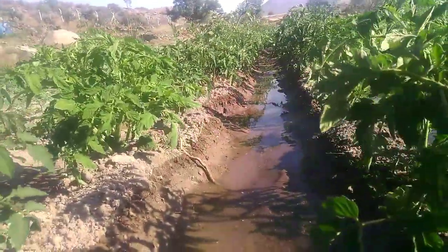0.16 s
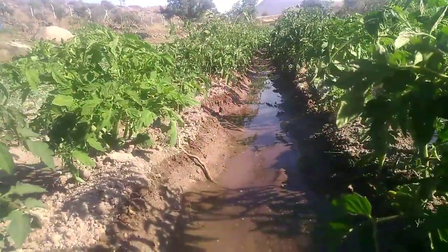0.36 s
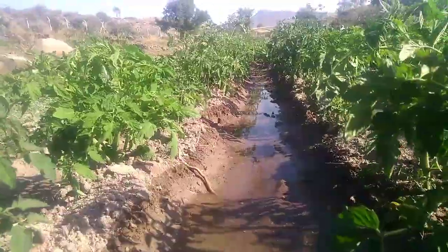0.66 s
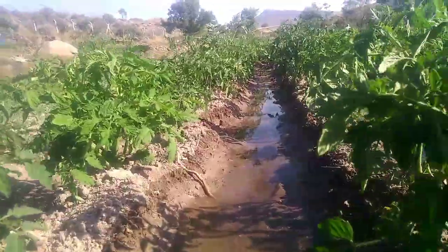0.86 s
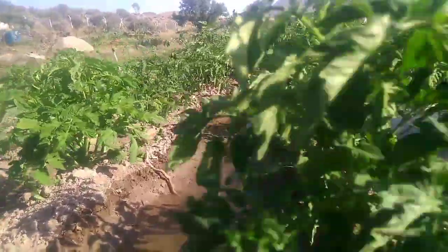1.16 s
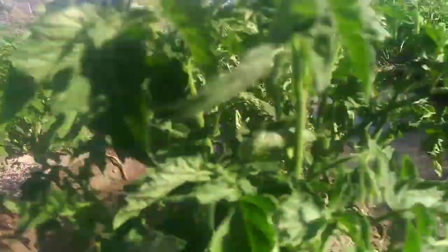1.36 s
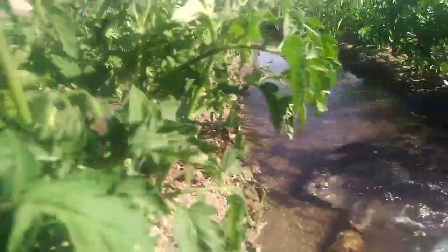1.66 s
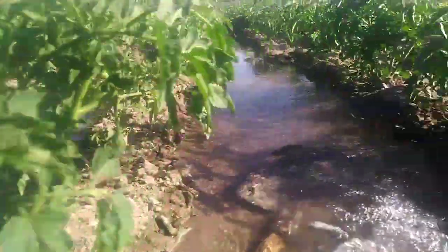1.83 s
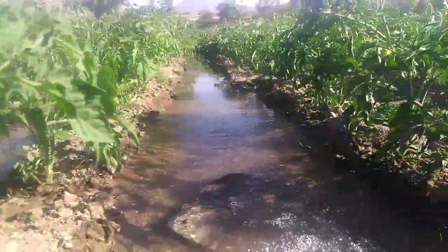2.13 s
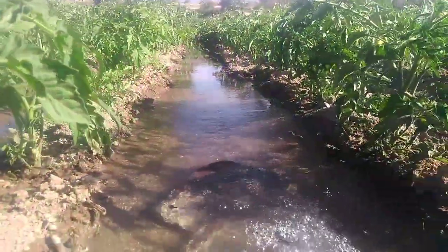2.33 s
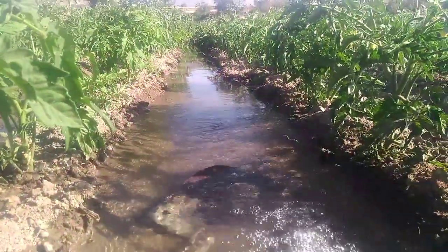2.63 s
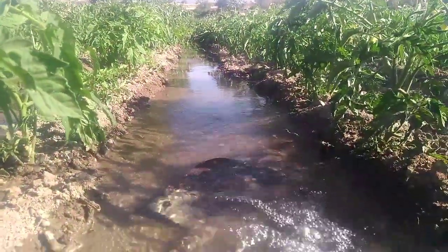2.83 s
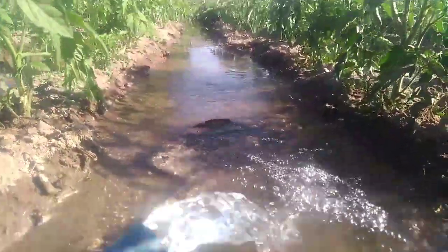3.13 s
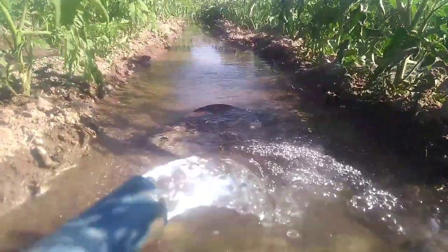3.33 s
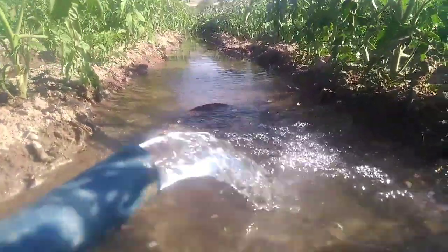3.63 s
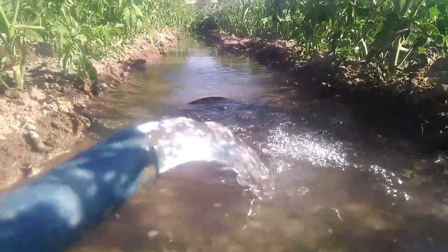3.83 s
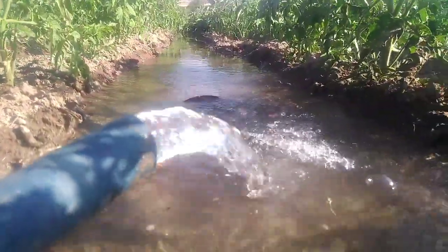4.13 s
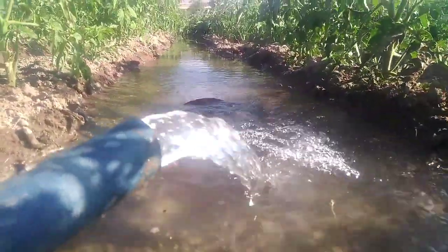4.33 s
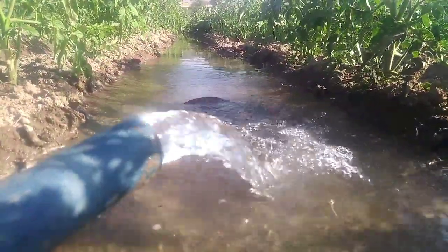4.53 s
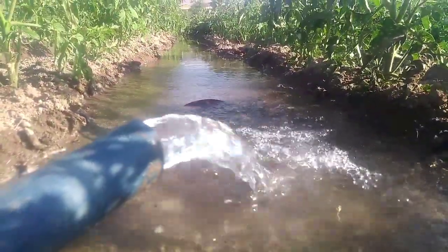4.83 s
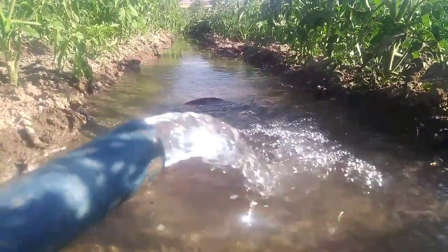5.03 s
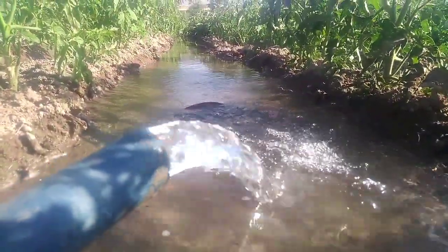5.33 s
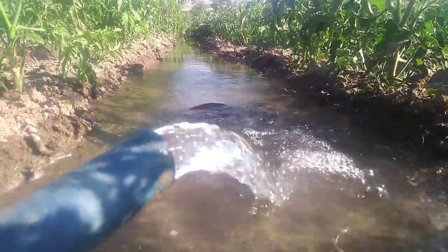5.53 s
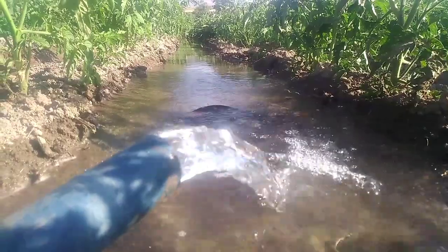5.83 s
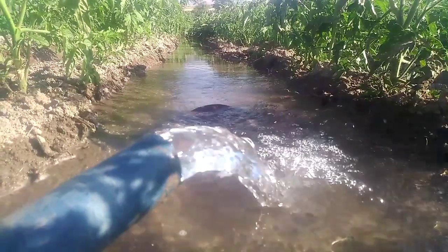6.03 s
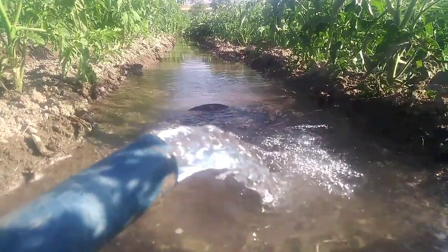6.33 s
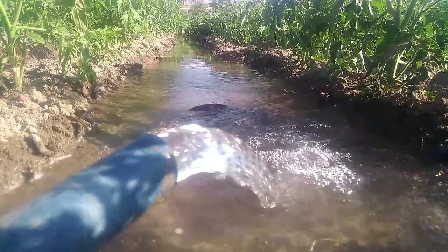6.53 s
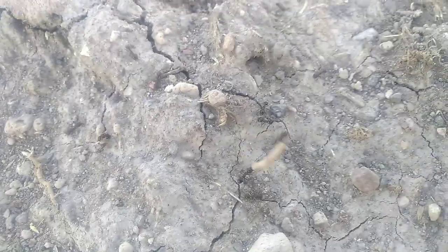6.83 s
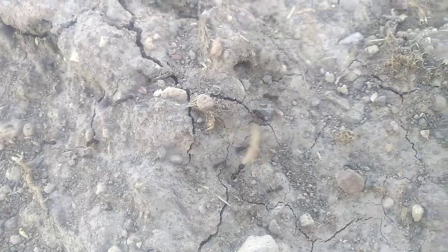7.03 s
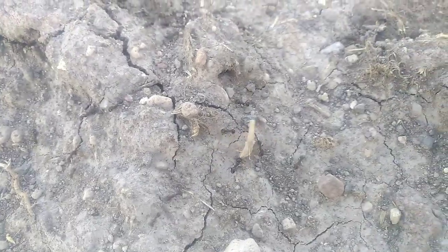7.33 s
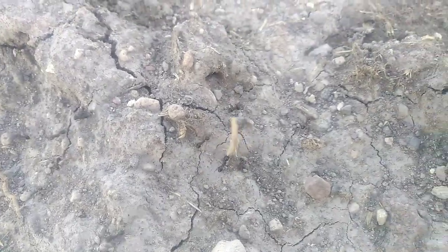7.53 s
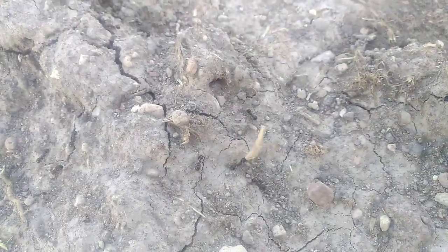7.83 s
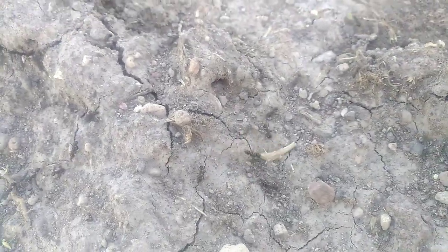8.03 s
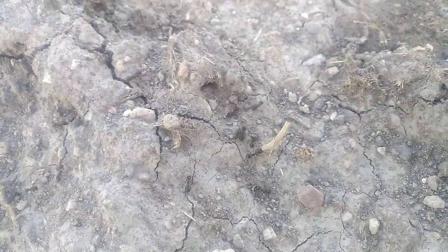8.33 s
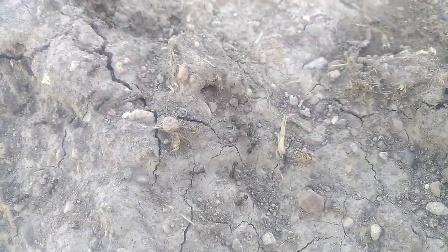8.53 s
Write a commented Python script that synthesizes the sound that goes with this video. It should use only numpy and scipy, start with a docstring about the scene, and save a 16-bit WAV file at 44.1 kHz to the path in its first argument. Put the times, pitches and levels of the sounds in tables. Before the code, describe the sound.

Outdoors in a crop field, a jet of water splashes into a flooded furrow, first softened behind leaves and off to the left, with light plops and a sharp tap on the handheld microphone. The microphone turns and moves close; the splash becomes central, louder and wider, full of gulps and bubbling. It cuts off abruptly, leaving very quiet open air with low rumble, faint hum, thin hiss and sparse dry ticks.

```python
"""A jet gushes from an irrigation pipe into a flooded furrow: swarms of damped sines over a noise wash.
Heard from behind leaves, with plops (clicks and rings) and taps on the housing (damped sines).
The microphone turns and nears the jet: low gulps and bloops (damped sines), glugs (gliding sines).
The water cuts off. Dry ground: far hum (wavering sines), thin hiss (band noise), ticks (noise snaps).
A low noise rumble lies under both, with a short gap at the cut."""
import sys
import numpy as np
from scipy import signal
from scipy.fft import rfft, irfft, next_fast_len
from scipy.io import wavfile
from scipy.ndimage import map_coordinates

SR = 44100
rng = np.random.default_rng(int(sys.argv[2]) if len(sys.argv) > 2 else 0)


def persist_wave(psi):
    """Save psi, clipped to +-1, as 16-bit WAV."""
    counts = np.round(np.clip(psi, -1, 1) * 32767).astype(np.int16)
    wavfile.write(sys.argv[1], SR, np.atleast_2d(counts).T)


N = 383225

# Jet position: [t/s, lead of left port/ms, nearness: 0 behind leaves, 1 facing, 2 close]
PLACE = [(0, 0.32, 0.23), (0.33, 0.32, 0.05), (0.7, 0.31, 0.11), (1.15, 0.31, 0.39), (1.5, 0.2, 0.94),
         (1.902, -0.024, 0.99), (2.8, -0.025, 1.28), (3.501, -0.057, 1.78)]
# Jet by place: [nearness, gurgle level/dB, spray level/dB, spread of leads/ms, bank echo level/dB]
LOUDNESS = [(0, -56, -49, 0.029, -12), (1, -50, -49, .11, -5.5), (2, -47.5, -45, .12, -3)]
# Splash colour at each place, relative: [f/Hz, level per Hz/dB]
BEHIND = [(120, -15), (250, -20), (440, -4.5), (600, -14), (950, -4), (1330, -17), (1600, -10),
          (1950, -7.5), (2200, -9), (2700, 0), (3400, -15.5), (5400, -12), (7800, -24.5), (11000, -22.5),
          (15500, -46)]
FACING = [(120, -16), (260, -16.5), (390, -3), (550, -14), (780, -1), (1050, -7.5), (2100, -2), (2800, -1),
          (3200, -3), (4400, -2.5), (6600, -7), (8000, -17), (10500, -13.5), (15500, -26.5)]
CLOSE = [(120, -11.5), (275, -12.5), (370, -6), (590, 2.5), (900, -2.5), (1550, 0), (1900, -5.5),
         (2300, 0.5), (3000, -7), (3600, 5), (5400, -2), (7000, -2.5), (8100, -22), (10500, -23.5),
         (15500, -30.5)]
# Colour of the churning pool, relative: [f/Hz, level per Hz/dB]
WASH = [(100, -9.5), (400, -4), (1000, 1.5), (1500, -17), (2700, 2), (5500, 1.5), (8000, -15.5), (9300, -1),
        (10800, -3), (12000, -7), (12800, -25), (15500, -26)]
# Colour of the open field's rumble, relative: [f/Hz, level per Hz/dB]
RUMBLE = [(20, -20), (50, -6.5), (100, 4.5), (220, -2.5), (340, -8), (450, -13.5), (650, -32), (1200, -42),
          (5500, -43), (12000, -55.5)]
# Lulls between bursts of splashing: [t/s, gain/dB]
LULLS = [(0.612, -6.5), (0.772, -6.5), (1.17, -3), (2.12, 0), (5.73, -4), (6.599, -5)]
# Loudest drops, each trapping a small bubble: [first contact t/s, reference level/dB, f/Hz]
PLOPS = [(0.1383, -25.5, 2660), (0.1553, -24, 2610), (0.22, -26.5, 2530), (0.455, -29, 2520),
         (0.5387, -26, 2820), (0.5546, -23.5, 5870), (0.578, -33.5, 2500), (0.716, -34, 3100),
         (0.732, -27.5, 3720), (0.826, -23, 2660), (0.8321, -24, 2680), (0.907, -30.5, 3950),
         (0.9906, -28, 4770), (1.267, -25, 2670), (1.292, -21.5, 4600), (1.393, -28.5, 2550),
         (1.5256, -29, 3900), (1.8947, -21, 5760), (1.9599, -22.5, 3930), (2.0394, -25.5, 2420),
         (2.645, -29, 6800), (2.174, -27, 3760), (2.347, -23.5, 2660), (2.4412, -20.5, 4480),
         (2.8971, -21.5, 4230), (3.0042, -23, 4900), (3.0388, -24, 4220), (3.189, -28.5, 4450),
         (3.4622, -19, 5000), (3.5345, -21.5, 3840), (3.578, -26.5, 3530), (3.7142, -20.5, 5330),
         (3.8763, -18, 5300), (3.913, -25, 3750), (4.034, -22, 3680), (4.3934, -23.5, 4500),
         (4.472, -22.5, 6400), (4.501, -21, 3620), (4.6085, -21.5, 5860), (4.6976, -25.5, 3950),
         (4.9075, -22.5, 3590), (4.9263, -22, 3700), (4.999, -18, 3600), (5.0363, -21.5, 4100),
         (5.087, -22, 4500), (5.2345, -25.5, 3750), (5.483, -20, 3800), (5.498, -21, 3530),
         (5.5364, -25, 5900), (5.56, -26.5, 3620), (5.698, -14.5, 4470), (5.7891, -18, 5320),
         (5.8757, -23, 2450), (5.8804, -16.5, 3730), (5.953, -24, 5900), (5.9614, -24, 6000),
         (5.964, -26.5, 2500), (6.051, -23, 5300), (6.183, -19, 3720), (6.3241, -21, 5970),
         (6.5548, -30.5, 2420)]
# Knocks on the microphone's housing: [t/s, level/dB, f/Hz, life/cycles]
KNOCKS = [(0.419, -9.5, 3350, 0.25), (0.421, -29, 4250, 1.7), (0.4235, -6, 3430, 0.59),
          (0.424, -16, 264, 0.32), (1.178, -37.5, 93.6, 1.7), (1.3, -57, 79, 7.6)]
# Gulps of the air pocket under the jet: [t/s, level/dB]
GULPS = [(1.291, -35), (1.464, -36), (1.954, -34), (2.276, -34), (2.378, -34), (3.179, -33), (3.363, -35),
         (3.533, -29), (3.77, -36.5), (4.008, -35), (4.098, -34.5), (4.244, -32), (4.625, -28.5),
         (4.689, -24.5), (5.034, -36), (5.693, -32), (5.967, -34), (6.058, -40)]
# Large bubbles from the plunge: [t/s, level/dB, starting f/Hz, life/cycles]
BLOOPS = [(1.553, -36, 862, 5.9), (1.628, -32.5, 2000, 4.4), (1.863, -35.5, 883, 3.6), (2.06, -33, 689, 3),
          (2.2293, -29.5, 2030, 5.1), (2.339, -28, 1100, 1.3), (2.592, -29, 1700, 11),
          (2.603, -32, 758, 4.6), (2.852, -32, 830, 6.9), (2.875, -22.5, 705, 1), (2.95, -29, 1150, 4.7),
          (3.039, -20, 1275, 6.1), (3.231, -27, 1470, 2.1), (3.33, -26.5, 1970, 2.4),
          (3.562, -27, 610, 1.4), (3.802, -34, 660, 5), (3.85, -24.5, 1830, 2.5), (4.103, -30, 737, 4.2),
          (4.397, -27, 1425, 5.2), (4.42, -30, 2200, 5.8), (4.533, -27.5, 920, 2.9),
          (4.635, -26.5, 1870, 3.9), (4.674, -23.5, 584, 3.4), (4.882, -28.5, 586, 1.9),
          (5.025, -27.5, 1210, 6.2), (5.092, -28.5, 585, 2.3), (5.328, -30, 1922, 2.2),
          (5.538, -30.5, 1164, 6.8), (5.672, -35.5, 686, 5.9), (5.881, -32, 571, 4.7),
          (5.937, -31, 540, 5.5), (6.052, -27, 880, 3.1), (6.118, -37, 490, 7.3), (6.185, -31, 890, 2.7),
          (6.536, -30.5, 1740, 7), (6.557, -22, 895, 1.4), (6.618, -28, 602, 3.2)]
# Ringing hollows in the water: [t/s, length/s, starting f/Hz, glide/octaves, level/dB]
GLUGS = [(1.807, 0.021, 720, 0.8, -46.5), (1.956, 0.11, 403, 2, -47.5), (2.039, 0.045, 2300, -1.4, -41.5),
         (5.988, .022, 521.4, 1.35, -40), (6.079, 0.02, 1023, 0.25, -40), (6.232, .038, 874, 2.1, -41)]
# Colour of the dry ground's hiss, relative: [f/Hz, level per Hz/dB]
HISS = [(6200, -34), (6800, 7.5), (7500, 4.5), (8000, -8.5), (8500, -7), (9800, -30), (10500, -36.5)]
# Faint ticks over dry ground: [t/s, level/dB, centre f/Hz]
TICKS = [(6.911, -74, 2880), (6.957, -70, 3680), (7.054, -59.5, 2040), (7.056, -71, 890),
         (7.076, -61.5, 1800), (7.075, -74, 835), (7.333, -56.5, 2830), (7.538, -60.5, 2310),
         (7.54, -55, 2870)]

CUT_S, TOP_HZ = 6.647, 15800  # water off; band limit
SWAY_DB, SWAY_PER_S = -1.24, 4  # uneven flow
DRY_SPRAY_DB = -5.5  # spray re bubbles, before colouring
BANKS_ABOVE_HZ = 730  # lower edge of the bank echo
FACING_DB_PER_MS = 1.5  # gain of the leading port; the other loses as much
LULL_WIDTH_S = 0.022
FOAM_DB, FOAM_LAG_S, FOAM_WIDTH_S = 2, 0.0048, 0.018
AIR_WET_DB, AIR_DRY_DB = -60.5, -62.5  # rumble beside the water, over dry ground
PLOP_DB, CLICK_DB, DROPS_DB = 6.5, -8, -8.5  # ring, click, each droplet re reference level
RING_DELAY_S, RING_SWELL_CYCLES = .0015, 3.3  # contact to ring; swell constant
GULP_HZ, GULP_CYCLES = 373, 1.5  # median pitch, life
BLOOP_RISE = 0.035  # pitch gain per life, as a share of starting pitch
CHURN_DB, CHURN_LAG_S = -11, 0.005  # lesser bubbles: level re large one, time scatter
LOW_HUM_HZ, LOW_HUM_DB, HIGH_HUM_HZ, HIGH_HUM_DB = 97.6, -82, 207, -67
SWELL_AT_S, SWELL_WIDTH_S, SWELL_DB = 6.77, 0.16, -58.5
HIGH_HUM_S, HIGH_HUM_ATTACK_S = 6.88, 0.13
THIRD_HUM_S, THIRD_HUM_HZ, THIRD_HUM_DB = 8.08, 350, -74
HISS_DB, BRIGHT_HISS_DB = -81.0, -88.5
TICK_T60_S, TICK_TAIL_DB, TICK_TAIL_T60_S = 0.0061, -20, 0.15
TICK_HALF_WIDTH_HZ = 390  # strongest tick; weaker ones are narrower


def amp(db):
    """Amplitude ratio of a level in dB."""
    return 10 ** (np.asarray(db) / 20)


def unit(x):
    """x at rms 1."""
    return x / np.sqrt(np.mean(x ** 2) + 1e-20)


def along(points, hz):
    """Interpolates (f/Hz, value) points on a log frequency axis."""
    f, v = np.transpose(points)
    return np.interp(np.log(hz + 1), np.log(f + 1), v)


def wobble(knots_per_s):
    """Smooth random curve through normally distributed knots."""
    knots = rng.standard_normal(4096)
    return map_coordinates(knots, [np.arange(N) * knots_per_s / SR], mode="wrap")


def bump(centre_s, width_s):
    """Gaussian rise to 1 and back."""
    return np.exp(-np.minimum(((np.arange(N) / SR - centre_s) / width_s) ** 2, 20))


def filtered(x, gain):
    """Minimum-phase filter with the given gain of frequency, by folding the cepstrum."""
    m = 2 * next_fast_len(N // 2 + SR // 8)
    cepstrum = irfft(np.log(np.maximum(gain(np.fft.rfftfreq(m, 1 / SR)), 1e-6)))
    cepstrum[1:m // 2] *= 2
    cepstrum[m // 2 + 1:] = 0
    response = np.exp(rfft(cepstrum))
    return irfft(rfft(x, m) * response, m)[..., :N]


def coloured(x, spectrum):
    """x shaped by (f/Hz, level/dB) points, at rms 1."""
    return unit(filtered(x, lambda hz: amp(along(spectrum, hz))))


def rush(spectrum, alike_hz):
    """Stereo noise of rms 1; the ports grow alike below alike_hz."""
    mid, side = rng.standard_normal((2, N))
    side = filtered(side, lambda hz: hz ** 2 / np.hypot(hz ** 2, alike_hz ** 2))
    return coloured(np.array([mid + side, mid - side]), spectrum)


def rings(start_s, size, hz, cycles, rise, lead_ms, pan_db, swell_cycles=0.26):
    """Damped, pitch-gliding sines with their own time and level offsets between ports."""
    life_s = cycles / hz
    length = (5 * life_s * SR).astype(int) + 2
    # all rings laid end to end: owner and sample offset of each entry
    which = np.repeat(np.arange(len(start_s)), length)
    step = np.arange(len(which)) - np.repeat(np.cumsum(length) - length, length)
    age = step / (life_s * SR)[which]  # in lives
    turns = cycles[which] * age * (1 + rise[which] * age / 2)
    envelope = np.exp(-age) * (1 - np.exp(-turns / swell_cycles))
    wave = size[which] * envelope * np.sin(2 * np.pi * turns)
    ports = []
    for side in (1, -1):
        first = np.maximum(np.round((start_s - side * lead_ms / 2e3) * SR), 0).astype(int)
        level = amp(side * pan_db / 2)[which]
        ports.append(np.bincount(first[which] + step, wave * level, N)[:N])
    return np.array(ports)


def lead_at(s):
    """Lead of the jet's sound at the left port, in ms."""
    times, lead_ms, _ = np.transpose(PLACE)
    return np.interp(s, times, lead_ms)


def nearness_at(s):
    """Nearness of the jet at the times s."""
    times, _, nearness = np.transpose(PLACE)
    return np.interp(s, times, nearness)


def by_nearness(table, s):
    """Each column of a (nearness, ..) table at the times s."""
    places, *cols = np.transpose(table)
    return [np.interp(nearness_at(s), places, c) for c in cols]


def banks(x):
    """Adds the very short, mostly treble echo scattered by banks and leaves: decaying noise taps."""
    t = np.arange(SR // 20) / SR
    tail = rng.standard_normal((2, len(t))) * amp(-60 * t / .022) * (t > .001)
    tail /= np.linalg.norm(tail, axis=1, keepdims=True)
    echo = signal.fftconvolve(x, tail, axes=1)[:, :N]
    echo = filtered(echo, lambda hz: hz ** 2 / (hz ** 2 + BANKS_ABOVE_HZ ** 2))
    echo_db = by_nearness(LOUDNESS, np.arange(N) / SR)[3]
    return x + amp(echo_db) * echo


def bubbles(surge, low_hz, high_hz, cycles, spread_db, clump_db, rise, pan_db, count):
    """Bubble swarm, clumped in level by surge; higher-pitched bubbles ring more cycles on average."""
    when, fraction, rank = rng.random((count, 3)).T
    damping, glide, place, tilt = rng.standard_normal((count, 4)).T
    start_s = when * CUT_S
    # pitch is uniform in its cube root
    hz = (np.cbrt(low_hz) + fraction * (np.cbrt(high_hz) - np.cbrt(low_hz))) ** 3
    clump = clump_db * surge[(start_s * SR).astype(int)]
    size = hz ** .7 * amp(spread_db * np.minimum(-np.log(rank), 3.1) + clump)
    life = cycles * (hz / 1500) ** .1 * np.exp(.45 * damping)
    # large bubbles form where the jet plunges and glide most; small ones are flung wide
    rise = rise * (.8 + glide).clip(-.5, 3) * np.minimum(900 / hz, 1)
    flung = hz / np.hypot(hz, 1300)
    width_ms = by_nearness(LOUDNESS, start_s)[2]
    lead_ms = lead_at(start_s) + width_ms * flung * place
    return rings(start_s, size, hz, life, rise, lead_ms, pan_db * tilt * np.sqrt(hz / high_hz))


def jet():
    """Ringing bubbles and dry spray thrown up together as lumps land; colour and level follow place."""
    lump = .22 * wobble(28) + .25 * wobble(110)  # shared by both swarms

    def surge():
        return np.tanh(lump + .2 * wobble(28) + .45 * wobble(110) + .25 * wobble(330))

    swarm = unit(bubbles(surge(), low_hz=200, high_hz=13000, cycles=4.8, spread_db=4.7,
                         clump_db=5.2, rise=.12, pan_db=7, count=12000))
    spray = unit(bubbles(surge(), low_hz=500, high_hz=13000, cycles=.7, spread_db=4.6,
                         clump_db=7, rise=.02, pan_db=9, count=9000))
    splash = banks(swarm + amp(DRY_SPRAY_DB) * spray)
    t = np.arange(N) / SR
    nearness = nearness_at(t)
    heard = np.zeros((2, N))
    for k, colour in enumerate((BEHIND, FACING, CLOSE)):
        heard += np.maximum(1 - abs(nearness - k), 0) * coloured(splash, colour)
    # below and above 2 kHz are levelled apart
    gurgle = signal.sosfiltfilt(signal.butter(4, 2000, fs=SR, output="sos"), heard)
    gurgle_db, spray_db = by_nearness(LOUDNESS, t)[:2]
    levelled = amp(gurgle_db) * unit(gurgle) + amp(spray_db) * unit(heard - gurgle)
    return amp(SWAY_DB * wobble(SWAY_PER_S)) * levelled


def lumps():
    """Jet gain: foam swells around each listed drop, bubble and gulp."""
    t = np.arange(N) / SR
    events = list(PLOPS) + list(BLOOPS) + list(GULPS)
    hits = np.bincount([int((row[0] + FOAM_LAG_S) * SR) for row in events], minlength=N)
    shape = np.exp(-((t[:SR // 5] - .1) / FOAM_WIDTH_S) ** 2)
    return amp(FOAM_DB * np.tanh(signal.fftconvolve(hits, shape, "same")))


def lulls():
    """Splash gain: slackens for a moment between bursts."""
    return amp(sum(db * bump(s, LULL_WIDTH_S) for s, db in LULLS))


def wash():
    """Soft noise of the churning pool, early at the port that faces it; lulls act at half depth in dB."""
    level = np.sqrt(lulls()) * amp(-56.0 + 1.6 * wobble(16))
    noise = level * rush(WASH, alike_hz=4500)
    index = np.arange(N)
    shift = lead_at(index / SR) * SR / 2e3  # samples
    left = map_coordinates(noise[0], [index + shift])
    right = map_coordinates(noise[1], [index - shift])
    return np.array([left, right])


def field_rumble():
    """Mostly low, wavering noise of the open field, nearly alike at both ports only at the very bottom."""
    return amp(wobble(12.0)) * rush(RUMBLE, alike_hz=25)


def plops(count=5):
    """A drop's bubble closes with a click and rings a few cycles while droplets land around it."""
    s, db, hz = np.transpose(PLOPS)
    s = s + RING_DELAY_S
    damping, glide, place = rng.standard_normal((len(s), 3)).T
    lead_ms = lead_at(s) + 0.058 * place
    cycles = 5 * np.exp(.2 * damping)
    ring = rings(s, amp(db + PLOP_DB), hz, cycles, 0.025 * glide, lead_ms, place, RING_SWELL_CYCLES)
    click_hz = 4000 * np.exp(.2 * glide)
    click = rings(s, amp(db + CLICK_DB), click_hz, np.full(len(s), .9), 0 * s, lead_ms, place)
    late, pitch, pan = rng.standard_normal((len(s) * count, 3)).T
    s, db, lead_ms = np.repeat([s, db, lead_ms], count, axis=1)
    drop_s = s + 0.00095 + 0.0018 * late
    drop_hz = 3800 * np.exp(.35 * pitch.clip(-2, 1.6))
    drops = rings(drop_s, amp(db + DROPS_DB), drop_hz, np.full(len(s), 1.8), 0 * s,
                  lead_ms + 0.078 * pan, 2 * pan)
    return ring + click + drops


def knocks():
    """Taps and soft bumps, damped sines, as the microphone moves through the plants; left is louder."""
    s, db, hz, cycles = np.transpose(KNOCKS)
    return rings(s, amp(db), hz, cycles, 0 * s, 0 * s, np.full(len(s), 7.))


def gulps():
    """The air pocket under the jet collapses: a short, low damped sine of nearly constant pitch."""
    s, db = np.transpose(GULPS)
    hz = GULP_HZ * np.exp(.06 * rng.standard_normal(len(s)))
    return rings(s, amp(db), hz, np.full(len(s), GULP_CYCLES), 0 * s, lead_at(s), 0 * s)


def bloops(count=3):
    """A large bubble's damped note rises as it nears the surface; lesser ones tear off around it."""
    s, db, hz, cycles = np.transpose(BLOOPS)
    place = rng.standard_normal(len(s))
    rise = np.full(len(s), BLOOP_RISE)
    note = rings(s, amp(db), hz, cycles, rise, lead_at(s) + 0.04 * place, place)
    late, pitch, pan = rng.standard_normal((len(s) * count, 3)).T
    s, db, hz = np.repeat([s, db, hz], count, axis=1)
    churn_s = s + CHURN_LAG_S * abs(late)
    churn_hz = np.maximum(hz * 2 ** pitch.clip(-1, 1.5), GULP_HZ)
    churn = rings(churn_s, amp(db + CHURN_DB), churn_hz, np.full(len(s), 2), 0 * s,
                  lead_at(s) + 0.086 * pan, pan)
    return note + churn


def glugs():
    """Hollows ring as sines of uneven pitch and level, gliding ever faster; same at both ports."""
    out = np.zeros(N)
    waver, flutter = np.exp(.06 * wobble(200)), amp(4 * wobble(150))
    for s, length_s, hz, octaves, db in GLUGS:
        span = round(s * SR) + np.arange(round(length_s * SR))
        progress = np.linspace(0, 1, len(span))
        pitch = hz * 2 ** (octaves * progress ** 1.7) * waver[span]
        envelope = np.minimum(10 * np.minimum(progress, 1 - progress), 1)
        tone = np.sin(2 * np.pi * np.cumsum(pitch) / SR)
        out[span] += amp(db) * envelope * flutter[span] * tone
    return out


def hum():
    """Far sines wavering in level and phase: low swells and sinks, high rises and holds, a third passes."""
    t = np.arange(N) / SR
    low = amp(LOW_HUM_DB) + amp(SWELL_DB) * np.exp(-abs(t - SWELL_AT_S) / SWELL_WIDTH_S)
    high = amp(HIGH_HUM_DB) * np.clip((t - HIGH_HUM_S) / HIGH_HUM_ATTACK_S, 0, 1)
    third = amp(THIRD_HUM_DB) * bump(THIRD_HUM_S, SWELL_WIDTH_S)
    out = np.zeros(N)
    for hz, level in ((LOW_HUM_HZ, low), (HIGH_HUM_HZ, high), (THIRD_HUM_HZ, third)):
        tone = np.sqrt(2) * np.sin(2 * np.pi * hz * t + .5 * wobble(10.0))
        out += level * amp(1.8 * wobble(13)) * tone
    return out


def hiss():
    """Thin band of noise, joined later by a higher band."""
    fade_in = np.interp(np.arange(N) / SR, [7.4, 8.6], [0, 1])
    bright = rush([(8300, -38.5), (8700, 5), (9900, -2.5), (10300, -44.5)], alike_hz=3000)
    return amp(HISS_DB) * rush(HISS, alike_hz=2970) + amp(BRIGHT_HISS_DB) * fade_in * bright


def ticks():
    """Snaps of band-passed noise with a weak tail, partly alike at the ports."""
    out, t = np.zeros((2, N)), np.arange(SR // 10) / SR
    fade = amp(-60 * t / TICK_T60_S) + amp(TICK_TAIL_DB - 60 * t / TICK_TAIL_T60_S)
    strongest_db = max(row[1] for row in TICKS)
    for s, db, hz in TICKS:
        half_hz = TICK_HALF_WIDTH_HZ * amp((db - strongest_db) / 2)
        band = signal.butter(3, [hz - half_hz, hz + half_hz], "band", fs=SR, output="sos")
        noise = rng.standard_normal(len(t)) + rng.standard_normal((2, len(t)))
        burst = signal.sosfilt(band, fade * noise)
        out[:, round(s * SR):][:, :len(t)] += amp(db) * burst / abs(burst).max()
    return out


def scene():
    """Water until the cut, then dry ground; field rumble under both."""
    t = np.arange(N) / SR
    before = np.clip((CUT_S - t) / .004, 0, 1)
    after = np.clip((t - CUT_S - .02) / .05, 0, 1)
    # the port that faces the jet hears it louder
    facing = amp(FACING_DB_PER_MS * lead_at(t) * np.array([[1], [-1]]))
    large = plops() + gulps() + banks(bloops())
    water = facing * (lulls() * lumps() * jet() + large) + glugs() + wash() + knocks()
    dry_ground = hum() + hiss() + ticks()
    air = field_rumble()
    return before * (water + amp(AIR_WET_DB) * air) + after * (dry_ground + amp(AIR_DRY_DB) * air)


def record(dry):
    """Tilts the ports, right brighter than left, and removes all from TOP_HZ up."""
    m = next_fast_len(N + SR // 4)
    hz = np.fft.rfftfreq(m, 1 / SR)
    left_re_right_db = along([(1200, 0), (4400, -1.0), (9000, -3.5)], hz)
    gain = amp([left_re_right_db / 2, -left_re_right_db / 2]) * (hz < TOP_HZ)
    return irfft(rfft(dry, m) * gain, m)[:, :N]


dry = scene()
out = record(dry)
persist_wave(out)
```